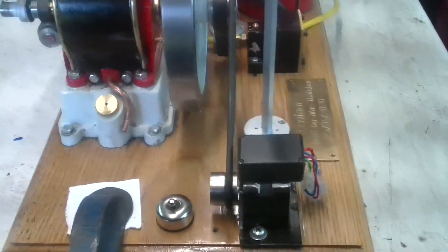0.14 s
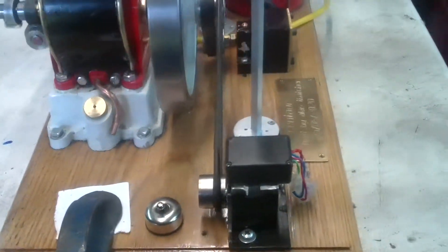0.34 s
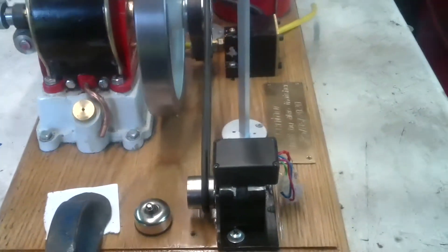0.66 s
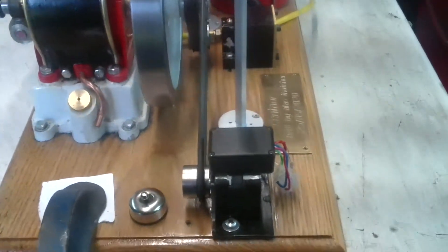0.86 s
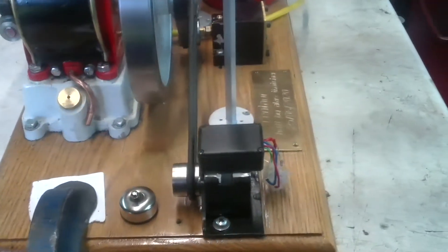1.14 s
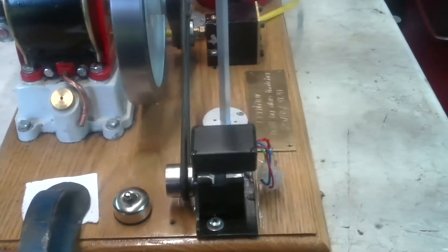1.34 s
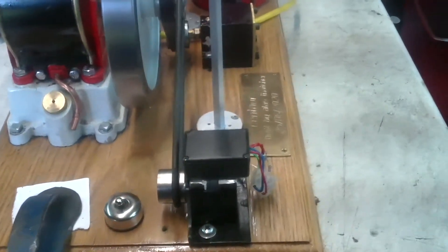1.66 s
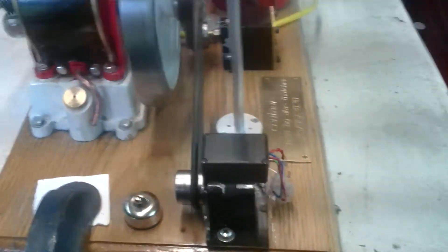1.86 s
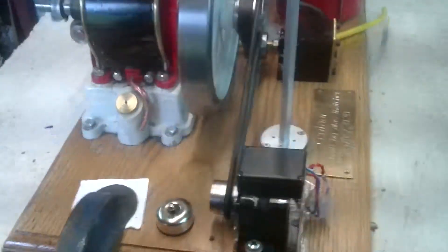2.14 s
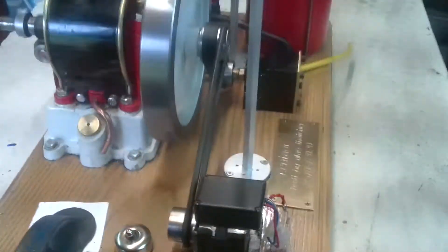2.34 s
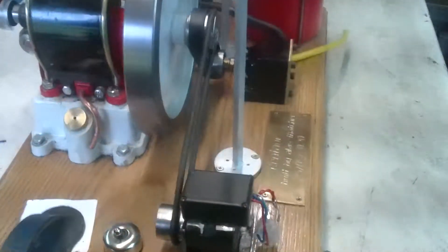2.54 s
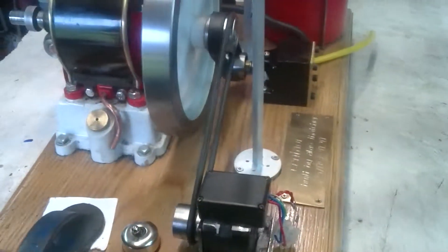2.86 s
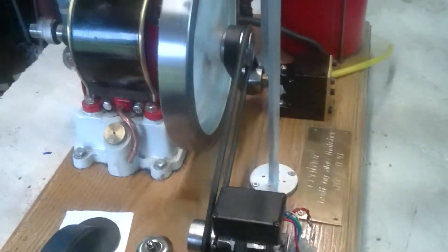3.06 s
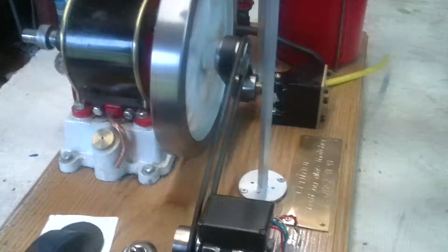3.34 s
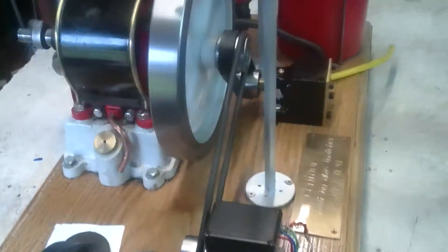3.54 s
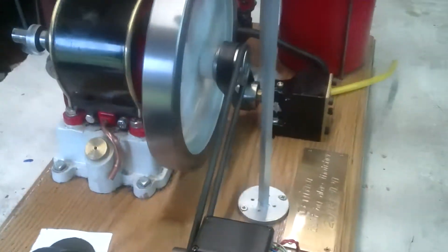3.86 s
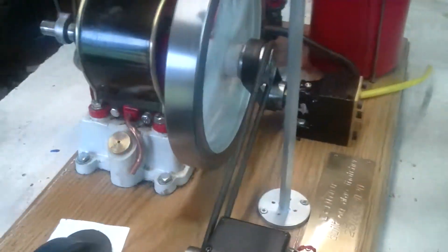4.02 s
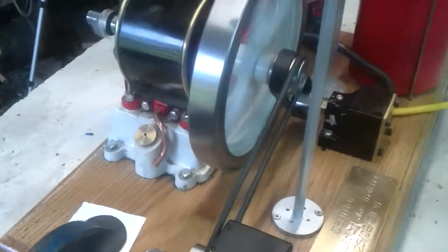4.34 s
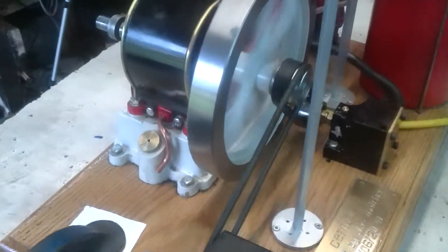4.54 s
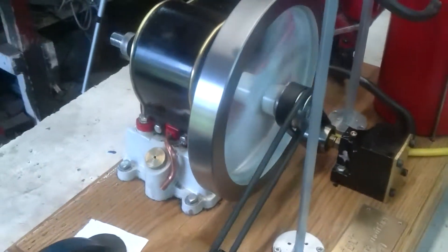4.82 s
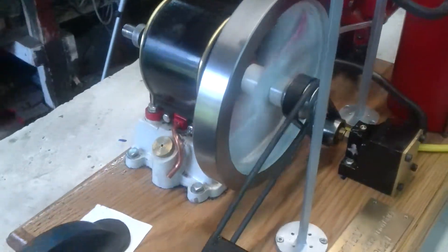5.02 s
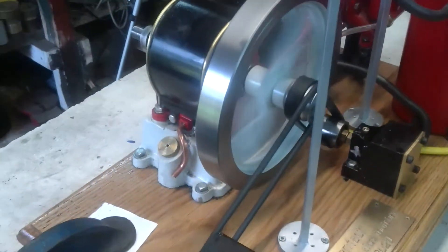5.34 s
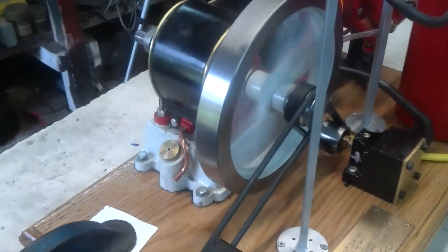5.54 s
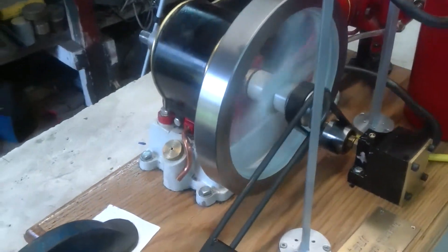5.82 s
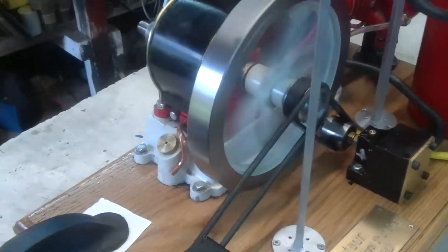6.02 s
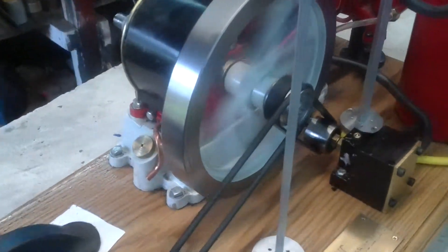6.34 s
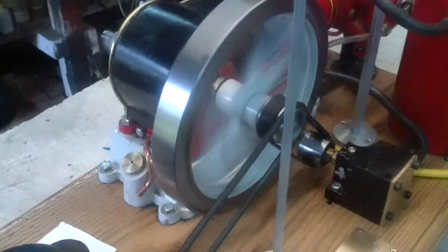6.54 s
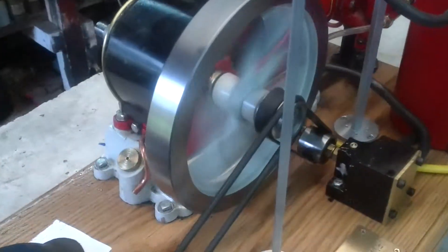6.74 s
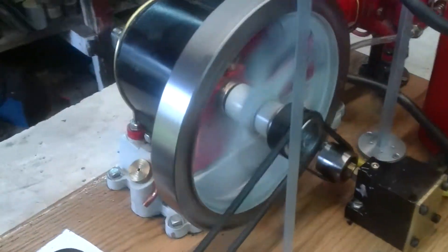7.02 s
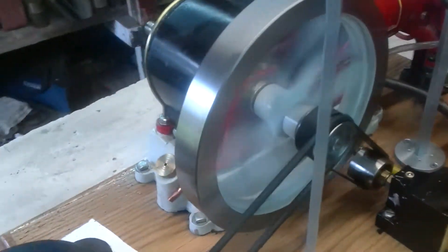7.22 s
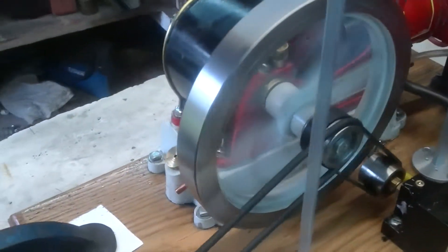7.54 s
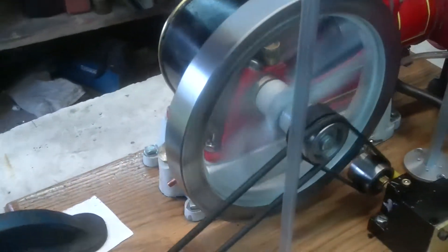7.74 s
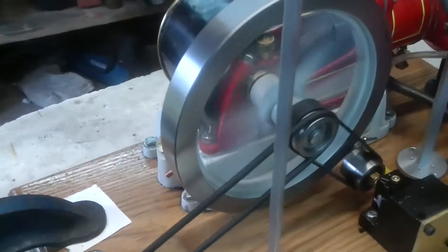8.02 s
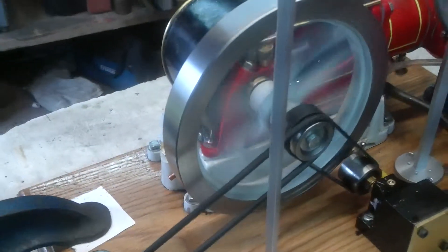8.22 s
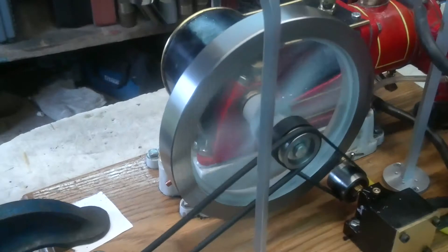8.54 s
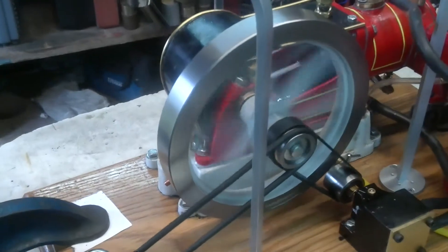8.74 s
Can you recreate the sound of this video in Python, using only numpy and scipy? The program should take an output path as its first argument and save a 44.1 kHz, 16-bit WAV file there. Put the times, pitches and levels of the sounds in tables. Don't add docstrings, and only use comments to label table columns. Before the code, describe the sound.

For nearly nine seconds a small four-stroke engine runs at about eight cycles per second, already going at the start and still going at the end. Each firing is a short, bright, hissing blast with a hollow low thump; misfires give only a weak puff. Fast ticks from breaker, inlet, cam and tappet follow, with brief knocks of block and wooden board. Around 0.6-1.1 s firings come evenly, then from about 1.4 to 2.5 s they mostly alternate with misses. Another steady run fills 3-4.2 s, then limping alternation dominates from about 5 to 6.8 s, with mixed patterns and a final even run from 8.5 s. A high flywheel ring is clear at first, weakens after 5 s and is gone by 6.5 s. Valve clatter peaks near 7.5 s while far-side resonance strengthens to the end. Belt whir, thin hiss, low bench hum and short workshop echoes persist, close-miked with little deep bass.

```python
import sys
import numpy as np
from scipy import signal
from scipy.fft import rfft, irfft
from scipy.io import wavfile
from scipy.ndimage import uniform_filter1d

SR = 44100
rng = np.random.default_rng(int(sys.argv[2]) if len(sys.argv) > 2 else 0)


def materialize(psi):
    bounded = np.clip(np.atleast_2d(psi).T, -1, 1)
    quanta = np.round(bounded * 32767).astype(np.int16)
    wavfile.write(sys.argv[1], SR, quanta)


def amplitude_ratio(level_db):
    exponent = np.asarray(level_db, float) / 20
    return 10 ** exponent


N = 391608
LEAD_IN = SR // 10
CYCLE_MS = 118.5

# [f/multiple of the pipe note, width/Hz, level/dB]
PIPE = [(0.928, 463, 2), (1.02, 350, 4.5), (1.15, 590, -3), (1.5, 834, -7), (2.084, 660, -1)]
# [f/multiple of the pipe note, width/Hz, level/dB]
LOW_PIPE = [(0.446, 370, 3), (0.554, 442, 8.5), (.72, 734, -3.5)]
# [f/multiple of the pipe note, width/Hz, level/dB]
CHUFF = [(1.0, 330, 5), (2.03, 600, -21)]
# [f/Hz, width/Hz, level/dB]
JET = [(7700, 2240, -7.5), (9600, 2580, -7), (13610, 1310, 12), (13940, 900, 9), (13900, 1440, 6.5)]
# [f/Hz, width/Hz, level/dB]
INLET = [(1940, 710, 9), (3590, 180, 13), (5600, 3500, 0.5), (8600, 430, 7.5), (11050, 5800, 6),
         (15000, 830, -20.5)]
# [f/Hz, width/Hz, level/dB]
TAPPET = [(2000, 1100, 2), (5200, 1300, 10), (8500, 6100, 6.5), (13300, 9900, 1.5)]
BREAKER = [(4800, 2000, 15.5), (7800, 2000, 15), (11700, 1800, 11)]
FOLLOWER = [(3320, 190, 0), (8500, 980, 1.8), (13800, 9300, 0.5)]
SEAT = [(3630, 410, 3.2), (10860, 1450, -0.4), (14600, 700, -3.6)]
# [f/Hz, level/dB, time to fall 60 dB/s]
BLOCK = [(704.8, -7.5, 0.097), (740, -10, 0.064), (788, 1.5, 0.034), (833, -15, 0.046)]
BOARD = [(228, -6, .13), (287, 0, .12), (360, -9, .05)]
BRACKET = [(1031, 10, 0.013), (1157, -0.5, 0.023), (1292, -2, 0.02), (2040, -1, 0.015)]
FAR_SIDE = [(231.8, -2, 0.17), (731.6, 5, 0.13)]
FLYWHEEL = [(5420, -17, .1), (8270, -16, .2), (8345, -14, .2), (8430, -18, .16), (12250, -20, .1)]
# [t from the valve knock/ms, block level/dB, board level/dB, bracket level/dB, scatter/ms]
CAM = [
    (-27, -3.5, -9, -3, 0.73),
    (-22, -6.5, -18.5, -4.5, 0.92),
    (-2, 2.5, -27, -7.5, 0.02),
    (9.5, -11, -23, -7.5, 0.24),
    (18, -42, -28, -16, 2.12),
    (31, -27, -46, -8.5, .6),
]
# [t after opening/ms, f/Hz, level/dB]
SWEEP = [(0, 306, -3), (3.17, 354, 0.5), (8.45, 236, -6), (12, 174.5, -6), (21.25, 182.6, -6),
         (27.8, 254.6, 3.5), (40.5, 308.5, -5), (63, 268, -10), (100, 285, -33)]
# [t/s, flywheel ring level/dB, far side level/dB, valve gear level/dB, outlet level/dB]
WALK = [
    (0, 17, -17, -0.2, -0.8),
    (1.8, 11, -23, 1.2, -2),
    (3.6, 12, -8, 1.6, -1),
    (5.2, 4, -8, 2, -0.5),
    (6.5, -20, -8.5, 2.2, 0),
    (7.5, -19, -1.5, 3, -1),
    (8.9, -17, 0, 2.1, -0.2),
]
# [t of valve knock/s, blast level/dB, pipe f/Hz, exhaust lead/ms]
RICH = [(0.2632, -9.5, 4400, 56), (.506, -11, 4100, 57), (1.3581, -10, 4390, 57.4),
        (1.5955, -10.5, 4180, 56.6), (1.831, -11.5, 4420, 59), (2.0698, -9, 4360, 57),
        (2.304, -10, 4200, 54.3), (2.5385, -10, 4340, 57.6), (3.0117, -7, 4400, 59.7),
        (4.4558, -10.5, 4200, 56), (4.6887, -9, 4280, 59), (5.169, -10, 4130, 55.7),
        (5.3989, -10.5, 4090, 56.4), (5.6207, -10, 4200, 54), (5.8457, -12, 4100, 55.5),
        (6.0746, -11.5, 4320, 58.6), (6.3135, -9.5, 4200, 59), (6.552, -11, 4130, 56.7),
        (6.7869, -7.5, 4070, 58.4), (7.264, -9, 4140, 58), (7.5039, -7.5, 4120, 60.5),
        (7.9792, -7.5, 4090, 57), (8.2087, -9, 4150, 55.5), (8.445, -9.5, 4120, 56)]
# [t of valve knock/s, blast level/dB, pipe f/Hz, exhaust lead/ms]
EVEN = [(0.0235, -4.5, 4330, 69), (0.626, -15.5, 4300, 61), (0.7436, -12, 4300, 58),
        (0.8644, -12, 4400, 61), (0.9909, -15.5, 4130, 63.5), (1.114, -12.5, 4230, 59),
        (2.6579, -15, 4420, 60.6), (2.7731, -11, 4330, 55), (3.1317, -11, 4270, 58.5),
        (3.2516, -11, 4430, 57), (3.3733, -11.5, 4350, 60.5), (3.4959, -11, 4460, 60),
        (3.6175, -11, 4270, 60), (3.737, -11.5, 4330, 60), (3.855, -11.5, 4260, 59),
        (3.9767, -9, 4380, 58.7), (4.1004, -10.5, 4270, 60), (4.2219, -11, 4360, 57.6),
        (4.8129, -10.5, 4280, 60.6), (4.931, -12.5, 4320, 57.3), (6.9103, -12.5, 4070, 63.4),
        (7.0292, -10.5, 4250, 57.7), (7.621, -9.5, 4370, 58.5), (7.739, -9, 4290, 58.4),
        (8.5631, -13, 4160, 57.4), (8.6794, -9, 4180, 55.6), (8.796, -14.5, 4160, 58.6),
        (8.9122, -10.5, 4210, 56.6)]
# [puff level/dB, jet level over its usual share/dB]
MISSES = [(-39, -6), (-33, -9), (-35, -7), (-31, -4), (-28, -11), (-29, -2), (-33, -5), (-36, -1),
          (-34, -1), (-21.5, -2), (-25, 0), (-26.5, 6), (-30, -2), (-29, -1), (-29, -2), (-21.5, 8.5),
          (-26, 4), (-29, 4), (-29, 3), (-27.5, -2), (-30, 0.5), (-22, 8), (-31, 3), (-31, 0.0)]
# [valve knock/dB, thump/dB, low pipe share/dB, jet share/dB, breaker tick/dB, inlet tick/dB]
BY_KIND = dict(rich=(-21, -36.5, -3, 2.5, -24, -27.5), even=(-21, -36, -2.5, 3.5, -28.5, -29),
           miss=(-22, -67, 2.5, -5, -34, -29.5))
UNEVEN_DB = (0.63, 0.83, 0.86, 0.98, 0.53, 2, 2.3)
# [f/Hz, level per Hz/dB]
WHIR = [(29, -66), (60, -82), (180, -50), (277, 4.5), (483, -8.5), (720, -1), (1500, -7.5), (4240, -33), ]
# [f/Hz, level per Hz/dB]
HISS = [(3000, 1), (7570, -6), (11400, -18), (14500, -8), (16000, -17)]


def evened(x):
    return x / np.sqrt(np.mean(x ** 2) + 1e-20)


def play(impulses, shape):
    return signal.oaconvolve(impulses, shape)[LEAD_IN:LEAD_IN + N]


def train(s, size):
    at = np.round(np.asarray(s) * SR).astype(int) + LEAD_IN
    inside = (at >= 0) & (at < N + LEAD_IN)
    return np.bincount(at[inside], size[inside], N + LEAD_IN)


def swell(s, db, rise, t60, tail_db=-80, tail_t60=.1):
    t = np.arange(SR // 4) / SR
    fall = amplitude_ratio(-60 * np.maximum(t - rise, 0) / t60)
    fall += amplitude_ratio(tail_db - 60 * t / tail_t60)
    onset = np.sin(np.pi / 2 * np.minimum(t / rise, 1)) ** 3
    return play(train(s, amplitude_ratio(db)), onset * fall)


def resonate(x, hz, width, order=1):
    r = np.exp(-np.pi * width / SR)
    if np.ndim(hz) == 0:
        return 2 * signal.lfilter([1 - r], [1, -r * np.exp(2j * np.pi * hz / SR)], x).real
    turn = np.exp(2j * np.pi * np.cumsum(hz) / SR)
    smooth = signal.lfilter([(1 - r) ** order], np.poly([r] * order), x * turn.conj())
    return 2 * (turn * smooth).real


def airy(envelope, peaks, scale=1, gust_db=1.5, order=1):
    flutter = evened(uniform_filter1d(rng.standard_normal(N), size=80))
    gusts = evened(amplitude_ratio(gust_db * flutter))
    drive = envelope * rng.standard_normal(N)
    total, power = 0, 0
    for k, (hz, width, db) in enumerate(peaks):
        band = amplitude_ratio(db) * resonate(drive * np.roll(gusts, k * SR), hz * scale, width, order)
        total = total + (-1) ** k * band
        power += amplitude_ratio(2 * db) * 2 * np.pi * width / SR / order
    return total / np.sqrt(power)


def ring(blows, modes, soft_ms=1.0):
    t = np.arange(SR // 6) / SR
    body = sum(amplitude_ratio(db - 60 * t / t60) * np.sin(2 * np.pi * hz * t) for hz, db, t60 in modes)
    return play(blows, body * (1 - np.exp(-t * 1000 / soft_ms)) ** 2)


def coloured(points, level_db):
    f, db = np.transpose(points)
    hz = np.fft.rfftfreq(N, 1 / SR)
    octaves_past = abs(np.log2((hz + 1) / np.clip(hz + 1, f[0], f[-1])))
    tilt_db = np.interp(np.log(hz + 1), np.log(f + 1), db) - 9 * octaves_past
    noise = irfft(rfft(rng.standard_normal(N)) * amplitude_ratio(tilt_db), N)
    return amplitude_ratio(level_db) * evened(noise)


def walk(s, column):
    return np.interp(s, *np.transpose(WALK)[[0, column]])


def whir():
    return coloured(WHIR, -42.5) + coloured(HISS, -50.5)


def bench():
    def tone(hz, width=14):
        return evened(resonate(resonate(rng.standard_normal(N), hz, width), hz, width))
    far_db = walk(np.arange(N) / SR, 2)
    return amplitude_ratio(-47 + 0.72 * far_db) * tone(228) + amplitude_ratio(-60) * tone(1070)


def workshop(x, t60=0.042):
    at = np.arange(200, SR // 3, 22)
    taps = np.zeros(SR // 2)
    signs = rng.choice([-1., 1.], len(at))
    taps[at + rng.integers(0, 22, len(at))] = signs * amplitude_ratio(-60 * at / SR / t60)
    return signal.oaconvolve(x, taps / np.linalg.norm(taps))[:N]


def strokes():
    rich, even = np.transpose(RICH), np.transpose(EVEN)
    fired = np.sort(np.r_[rich[0], even[0]])
    puff_db, share_db = np.transpose(MISSES)
    miss_s = (rich[0] + fired[np.searchsorted(fired, rich[0]) - 1]) / 2
    missed = np.array([miss_s, puff_db, 0.986 * rich[2], 58.5 + 0 * puff_db])
    kinds = {"rich": rich, "even": even, "miss": missed}
    order = np.argsort(np.r_[rich[0], even[0], missed[0]])
    s, blast_db, pipe_hz, lead_ms = np.hstack(list(kinds.values()))[:, order]
    usual = np.vstack([np.tile(BY_KIND[k], (len(v[0]), 1)) for k, v in kinds.items()])[order]
    over_db = np.hstack([v[1] - np.median(v[1]) for v in kinds.values()])[order]
    own_jet_db = np.r_[0 * fired, share_db][order]
    tappet_scatter_ms = 0.6
    *chance_db, late_ms = (rng.standard_normal((len(s), 8)) * np.r_[UNEVEN_DB, tappet_scatter_ms]).T
    knock, thump, low, jet, breaker, seat = usual.T + chance_db[:6]
    gear_db, outlet_db = walk(s, 3), walk(s, 4)
    lag_ms = 7.2 + 0.36 * (CYCLE_MS - 1000 * np.gradient(s)) + late_ms
    return dict(s=s, opens=s - lead_ms / 1000 - .0027, missed=order >= len(fired),
                blast_db=blast_db, pipe_hz=pipe_hz, knock_db=knock + gear_db,
                thump_db=thump + outlet_db + 0.7 * over_db, low_db=blast_db + low,
                jet_db=blast_db + jet + own_jet_db + outlet_db, breaker_db=breaker, seat_db=seat,
                tappet_s=s + lag_ms / 1000, tappet_db=-28 + gear_db + chance_db[6])


def ticks(s, knock_db, tappet_s, tappet_db, breaker_db, seat_db, **_):
    stretch = np.gradient(s) / CYCLE_MS
    seat_s = s - 29 * stretch
    out = airy(swell(s - 41 * stretch, breaker_db + 4.0, .0003, 0.053), BREAKER)
    out += airy(swell(seat_s, seat_db + 2.0, 0.0014, 0.037), SEAT)
    out += airy(swell(seat_s, knock_db - 14.0, 0.012, 0.23), INLET)
    out += airy(swell(s - 3.6 * stretch, knock_db - 14.0, 0.00022, 0.067), FOLLOWER)
    out += airy(swell(tappet_s - .001, tappet_db + 5.5, 0.0005, .011, -12, 0.2), TAPPET)
    out += airy(swell(s + 49 * stretch, knock_db - 40, .001, .03), [(15200, 1200, 0)])
    ring_db = knock_db + walk(s, 1)
    jolts = train(tappet_s, amplitude_ratio(ring_db - 23)) + train(seat_s, amplitude_ratio(ring_db - 25))
    return out + ring(jolts, FLYWHEEL, soft_ms=.1)


def valve_gear(s, knock_db, **_):
    stretch = np.gradient(s) / CYCLE_MS
    blows = np.zeros((4, N + LEAD_IN))
    far_db = walk(s, 2)
    for ms, block_db, board_db, bracket_db, scatter_ms in CAM:
        late, *uneven = rng.standard_normal((len(s), 4)).T
        at = s + ms * stretch + late * scatter_ms / 1000
        loose_db = 2.2 * min(scatter_ms, 1)
        levels = [knock_db - 5.0 + db + loose_db * u
                  for db, u in zip((block_db, board_db, bracket_db), uneven)]
        levels.append(knock_db - 20 + block_db + far_db)
        blows += [train(at, amplitude_ratio(db)) for db in levels]
    return sum(ring(b, modes) for b, modes in zip(blows, (BLOCK, BOARD, BRACKET, FAR_SIDE)))


def gas_rush(opens, blast_db, low_db, jet_db, pipe_hz, missed):
    last = np.clip(np.searchsorted(opens, np.arange(N) / SR) - 1, 0, None)
    since = np.arange(N) / SR - opens[last]
    held_hz = pipe_hz[last]
    wander = 0.018 * rng.uniform(-0.41, 1, len(opens))[last]
    chuff_climb = 1 + 0.097 * (np.clip(since / 0.019, 0, 1) ** 2 - .5)
    jet_climb = 1 + wander - 0.03 * np.exp(-abs(since) / 0.0033)
    puffs = swell(opens[missed], blast_db[missed] - 14, 0.009, 0.2)
    blasts = swell(opens, blast_db - 8 - 3.4 * missed, 0.0077, 0.018, -6.0, 0.19)
    lows = swell(opens, low_db - 19.0, 0.0067, 0.063, -6.5, 0.25)
    jets = swell(opens, jet_db - 6.0, 0.0077, 0.033, -6.5, 0.17)
    rush = airy(puffs, CHUFF, held_hz * chuff_climb, gust_db=0.5, order=2)
    rush += airy(blasts, PIPE, held_hz, gust_db=3.5, order=2)
    rush += airy(lows, LOW_PIPE, held_hz, order=2)
    return rush + airy(jets, JET, jet_climb, gust_db=2.0)


def exhaust(s, opens, knock_db, blast_db, low_db, jet_db, pipe_hz, thump_db, missed, **_):
    rush = gas_rush(opens, blast_db, low_db, jet_db, pipe_hz, missed)
    push = amplitude_ratio(blast_db)
    knock = ring(train(opens + 0.00053, push * amplitude_ratio(-17)), BLOCK)
    knock += ring(train(opens + 0.0059, push * amplitude_ratio(-22.5)), BRACKET)
    t = np.arange(SR // 10) / SR
    ms, hz, db = np.transpose(SWEEP)
    phase = 2 * np.pi * np.cumsum(np.interp(t * 1000, ms, hz)) / SR
    hoot = amplitude_ratio(np.interp(t * 1000, ms, db)) * np.sin(phase)
    hoot += amplitude_ratio(5.5) * np.exp(-((t - .012) / 0.0086) ** 2)
    plop = np.exp(-((t - .01) / 0.0021) ** 2) * np.cos(2 * np.pi * 230 * (t - .01))
    thumps = play(train(opens, amplitude_ratio(thump_db + 4.5)), hoot)
    return rush + knock + thumps + play(train(s - .06, amplitude_ratio(knock_db - 19.5)), plop)


def scene():
    beat = strokes()
    engine = ticks(**beat) + valve_gear(**beat) + exhaust(**beat)
    bright = signal.sosfilt(signal.butter(2, 900, "highpass", fs=SR, output="sos"), engine)
    return (whir() + bench() + amplitude_ratio(-14) * workshop(bright) + engine)[None]


def low_pass(x):
    return signal.sosfilt(signal.butter(12, 16800, fs=SR, output="sos"), x)


def record(dry):
    overload = 1.3
    thin = signal.sosfilt(signal.butter(3, 105, "highpass", fs=SR, output="sos"), dry)
    thin = overload * np.tanh(thin / overload)
    edge = signal.firwin(255, 15600, window=("kaiser", 6), fs=SR)
    mix = signal.oaconvolve(thin, edge[None], "same")
    return low_pass(mix)


dry = scene()
out = record(dry)
materialize(out)
```